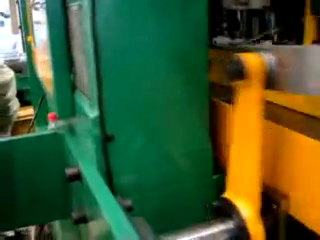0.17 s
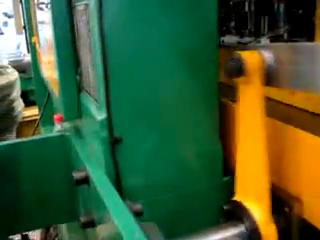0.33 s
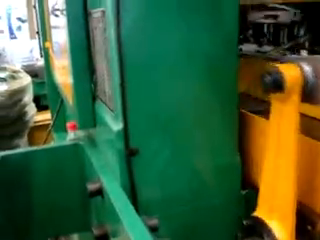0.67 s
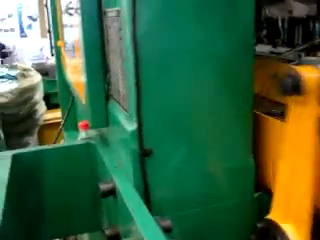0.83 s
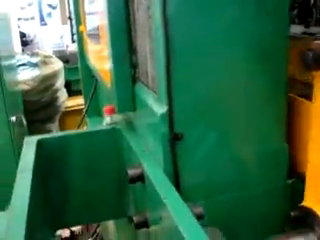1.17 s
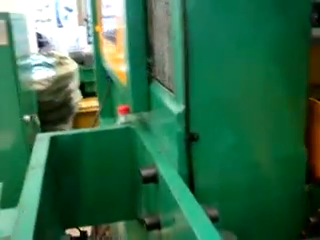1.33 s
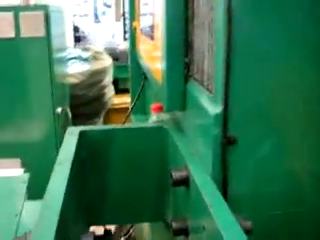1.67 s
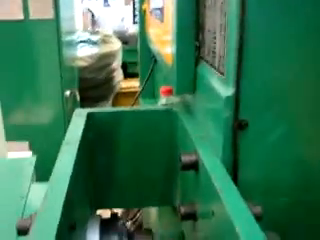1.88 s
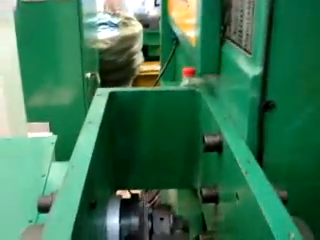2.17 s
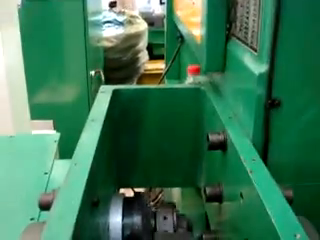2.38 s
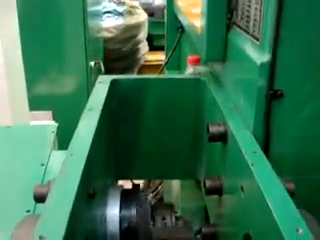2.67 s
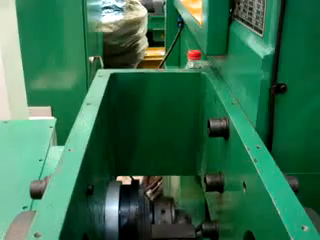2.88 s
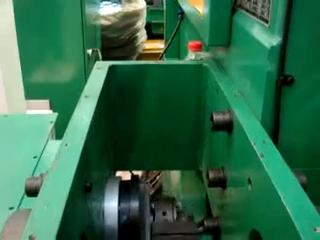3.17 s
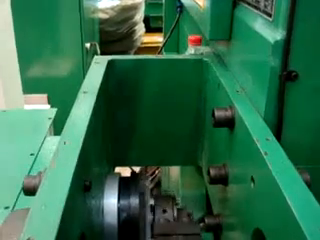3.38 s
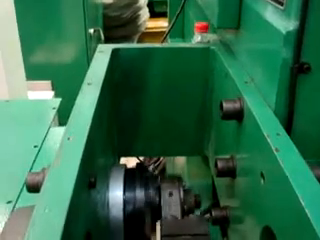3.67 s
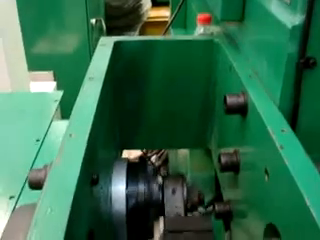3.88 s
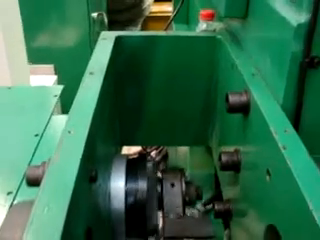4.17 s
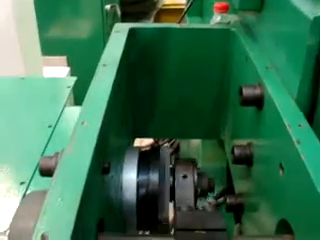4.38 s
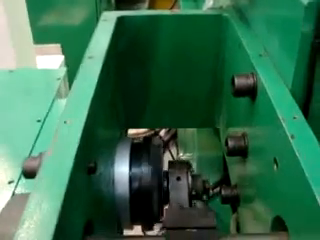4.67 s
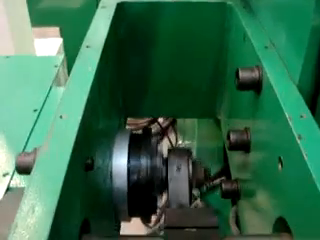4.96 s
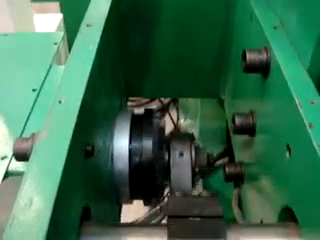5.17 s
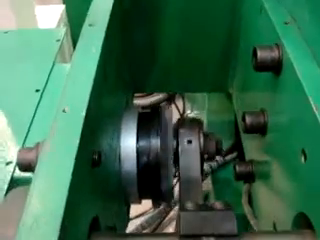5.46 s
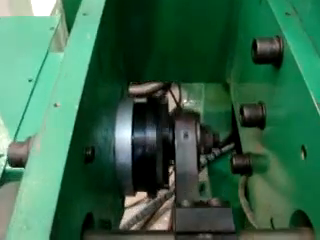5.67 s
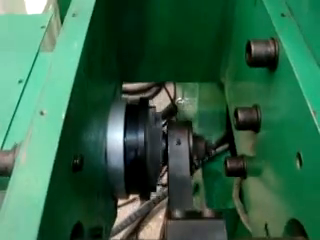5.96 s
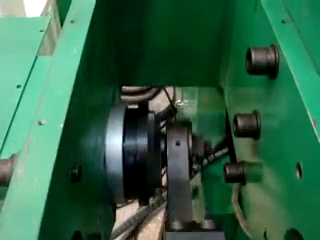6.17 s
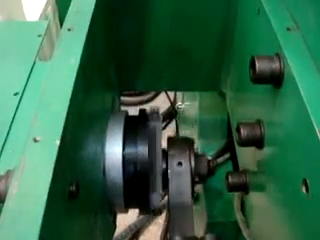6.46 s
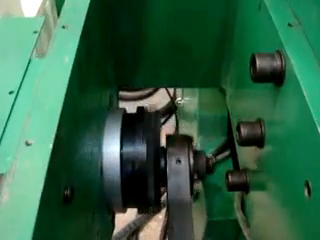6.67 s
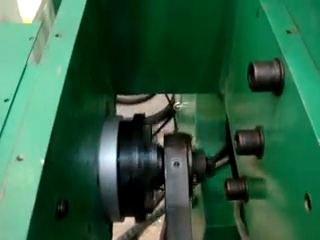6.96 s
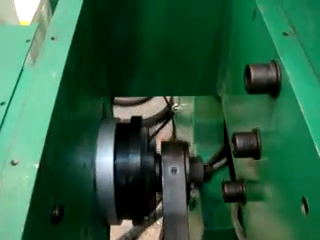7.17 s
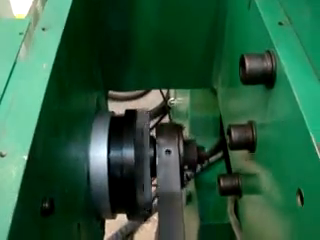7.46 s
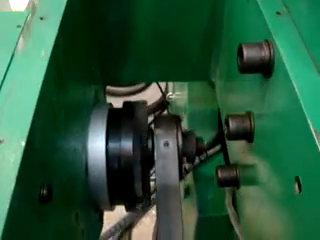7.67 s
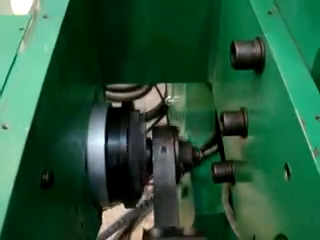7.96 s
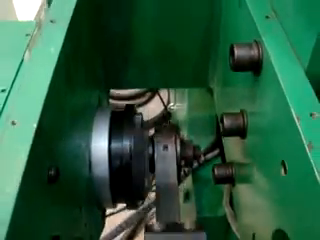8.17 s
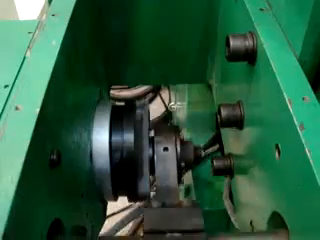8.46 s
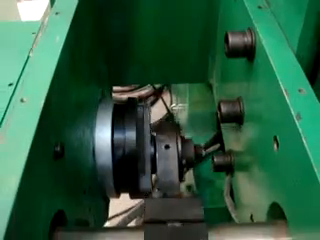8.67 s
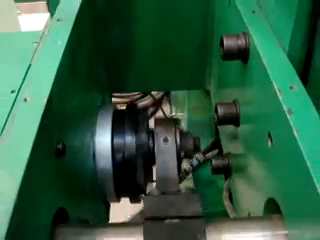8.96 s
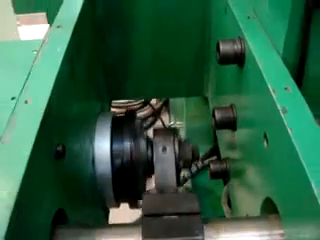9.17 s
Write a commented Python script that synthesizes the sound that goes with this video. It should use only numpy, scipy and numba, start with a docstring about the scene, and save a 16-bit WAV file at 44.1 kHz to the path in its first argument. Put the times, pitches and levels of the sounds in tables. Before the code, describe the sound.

From 0 to about 9.5 seconds a metal stamping press runs without pause, close to a phone microphone in a factory hall. Every 0.22 seconds the same cycle repeats: quick feed ticks and a short hiss of sliding strip, a heavy low clang as the punch lands, then about 0.04 seconds later a brighter, ringing snap and chatter as the tool lifts. Dull bearing knocks and a churning gear rumble fill the gaps. Tiny high squeaks occur until nearly 6 seconds, clearer near 1.3, 1.6, 2, 4.7 and 5.1. Extra slaps fall near 0.5, 0.7, 3.3, 4.5 and 9.3. Around 1 to 2 seconds a hollow resonance sinks in pitch; it fades after 4, while bright clatter softens from 3.3. Metallic ring colours drift slowly, peaks are slightly squashed, and a short diffuse echo surrounds the strokes.

```python
"""A stamping press at 272 strokes/min: each turn the strip feeds in, the punch clangs low, the tool lifts brightly.
Contacts set off dense decaying rings and strong modes; the lower part of each ring nearly repeats every turn.
Strip hiss, squeaks and slaps join in, with bearing knocks and a churning drive below.
A phone moves slowly along the frame: modes drift, a hollow note sinks and fades, bright clatter fades.
The strokes echo in a factory hall."""
import sys
import numpy as np
from scipy import signal
from scipy.fft import rfft, irfft, next_fast_len
from scipy.io import wavfile
from scipy.ndimage import uniform_filter1d
from numba import njit

SR = 44100
rng = np.random.default_rng(int(sys.argv[2]) if len(sys.argv) > 2 else 0)


def put_to_file(sound):
    """Save the sound as 16-bit audio at rate SR, in the file named by the first command-line argument."""
    columns = np.atleast_2d(sound).T  # one column per channel
    safe = np.clip(columns, -1, 1)
    whole_steps = np.round(safe * 32767)
    wavfile.write(sys.argv[1], SR, whole_steps.astype(np.int16))


N = 411453

# contacts within one turn [t/s after the punch lands, relative level/dB]
PUNCH_HITS = [(-.0005, -2), (.0048, 1.5), (.0135, -1), (.021, -14), (.029, -7)]
LIFT_HITS = [(.0385, -1.5), (.042, 1.5), (.0505, -4.5), (.0565, -11), (.066, -8), (.074, -17), (.098, -13)]
FEED_HITS = [(-.060, -20), (-.035, 4.5), (-.021, 0.5), (-.013, 5.5), (-.006, 5.5)]
# knocks of the crank bearings within one turn [t/s after the punch lands, relative level/dB]
THUD_HITS = [(.021, 2.5), (.029, 1.5), (.068, -5), (.107, -2), (.123, -6.5)]
# modes of the frame under the punch, and of the lifting tool [f/Hz, relative level/dB]
FRAME_MODES = [(345, -7), (425, -6), (474, -7), (517, -2), (640, -3), (668, 0), (762, -3), (805, -2),
               (867, -3), (980, -7), (1045, 0), (1090, -3), (1254, -2), (1402, -4), (1533, -3), (1634, -4)]
TOOL_MODES = [(276, -7), (334, -1), (401, -6), (530, -1), (563, -1), (600, -1), (711, -1), (936, 0),
              (990, -2), (1320, -3), (1367, 0), (1682, -4), (2210, -1), (2245, 1), (2417, -1), (2557, -3),
              (2592, 0), (2700, -2), (2815, -4), (3060, -5), (3577, -5)]
# spectra of the dense rings [f/Hz, relative level per Hz/dB]
PUNCH_COLOUR = [(50, -42.5), (120, -25), (230, -28), (400, -5.5), (700, 4), (1100, 1.5), (1700, 1.5),
                (2500, -3), (3500, -5), (4500, -7.5), (6000, -11), (8000, -22.5), (10000, -88)]
LIFT_COLOUR = [(50, -43), (120, -28), (230, -28), (400, -18), (700, -9.5), (1300, -4.5), (1750, -11),
               (2250, -6.5), (2700, -7), (3400, -12.5), (4400, -18), (6000, -16), (8000, -23), (10000, -35)]
FEED_COLOUR = [(100, -33), (350, -19), (800, -22), (1400, 12.5), (2500, 8), (4000, 7), (5700, 9),
               (8000, -6.5), (10000, -3)]
THUD_COLOUR = [(40, -43), (80, -21.5), (130, -12), (230, -4), (380, -2), (650, -2), (1000, -2),
               (1600, -14.5), (4000, -62)]
# spectra of the sliding strip and the drive [f/Hz, relative level per Hz/dB]
SLIDE_COLOUR = [(500, -52), (2000, -10), (4000, 0.5), (5700, 3.5), (7000, 6.5), (8500, 5.5), (10000, -18)]
DRIVE_COLOUR = [(25, -42), (50, -45.5), (80, -22.5), (120, -12.5), (210, 1), (370, 2.5), (700, 3),
                (1050, -0.5), (1700, -6.5), (2700, -18.5), (4000, -13), (6000, -25.5), (10000, -31.5)]
# loudest squeals of the strip in its guides [t/s, relative level/dB]
SQUEAKS = [(0.017, -29.4), (1.342, -30.5), (1.559, -31), (2.002, -29.4), (4.651, -31.5), (5.096, -31)]
# strip slapping the die just ahead of the punch [t/s, relative level/dB]
SLAPS = [(0.473, -17.5), (0.697, -16.5), (3.345, -20), (4.45, -19.5), (9.305, -20.5)]
# 60 dB decay times [dense body/s, dense treble/s, strong modes towards 0 Hz/s]
PUNCH_T60_S = (.095, .115, .22)
LIFT_T60_S = (.10, .135, .38)

FIRST_S, TURN_S = .0447, .220694
STARTS_S = FIRST_S + TURN_S * np.arange(-2, 43)
AGE_S = np.arange(20000) / SR
TIME_S = np.arange(N) / SR
TOP_HZ = 9900

# part levels
PUNCH_DB, LIFT_DB, FEED_DB = 0.59, -1.65, -2.5
DRIVE_DB, DRIVE_FADE_DB_PER_S = 1.6, .17
# faint squeaks, by chance, until the strip runs freely
SQUEAK_CHANCE, SQUEAK_DB, SQUEAK_LEAD_S, STICKS_UNTIL_S = .5, -34, .024, 5.7
# phone swings from the tool's open side to a pocket between the guards, then leans over its rim
SWING_S, SWING_TAKES_S = 1.44, 0.38
HOLLOW_START_HZ, HOLLOW_END_HZ, HOLLOW_WIDTH_HZ = 945, 690, 190.0
HOLLOW_DB, HOLLOW_LEFT_S, HOLLOW_FADE_DB_PER_S = -8.5, 4, 5.5
BRIGHT_HZ, BRIGHT_WIDTH_HZ = 3540.0, 770.0
BRIGHT_DB, BRIGHT_SHADED_S, BRIGHT_FADE_DB_PER_S = -7.5, 3.3, 7.5


def punch():
    """The punch lands and breaks through the strip; the frame clangs."""
    body_t60_s, treble_t60_s, mode_t60_s = PUNCH_T60_S
    crash = clatter(PUNCH_HITS, PUNCH_COLOUR, body_t60_s, treble_t60_s,
                    repeat_hz=1830, scatter_db=0.0, crack=0.62)
    frame = clang(FRAME_MODES, offset_s=-0.00049, t60_s=mode_t60_s, half_hz=1770,
                  wander_db=2.0, scatter_db=0.0)
    return undb(-17.5) * crash + undb(-21) * frame


def lift_off():
    """The stripper plate snaps back against its stops and chatters; the tool rings."""
    body_t60_s, treble_t60_s, mode_t60_s = LIFT_T60_S
    crash = clatter(LIFT_HITS, LIFT_COLOUR, body_t60_s, treble_t60_s,
                    repeat_hz=3300, scatter_db=1.5, crack=0.94)
    tool = clang(TOOL_MODES, offset_s=.041, t60_s=mode_t60_s, half_hz=1120,
                 wander_db=1.0, scatter_db=0.2)
    return undb(-15.5) * crash + undb(-22.5) * tool


def feed():
    """The feed linkage ticks; the strip hisses as it slides forward, and squeaks."""
    ticks = clatter(FEED_HITS, FEED_COLOUR, t60_s=0.1, treble_t60_s=0.12,
                    repeat_hz=2200, scatter_db=3.0, crack=0.25)
    speed = np.exp(-((AGE_S - TURN_S / 2) / 0.037) ** 2)
    grip = undb(1.5 * rng.standard_normal((len(STARTS_S), 1)))
    hiss = grip * speed * dense_ring(SLIDE_COLOUR, repeat_hz=3000)
    slide = each_turn(hiss, -.008 - TURN_S / 2)  # fastest 8 ms before the punch
    return undb(-30.5) * ticks + undb(-31.5) * slide + squeaks()


def squeaks(squeak_hz=5780, waver_rms_hz=70, length_s=0.0088):
    """Now and then the strip sticks and sings for an instant, on a wavering pitch."""
    sticks = (rng.random(len(STARTS_S)) < SQUEAK_CHANCE) & (STARTS_S < STICKS_UNTIL_S)
    faint = [(s - SQUEAK_LEAD_S, SQUEAK_DB) for s in STARTS_S[sticks]]
    swells = [undb(db) * np.exp(-((TIME_S - s) / length_s) ** 2) for s, db in SQUEAKS + faint]
    waver = unit(uniform_filter1d(rng.standard_normal(N), size=100))
    hz = squeak_hz + waver_rms_hz * waver
    tone = unit(np.sin(2 * np.pi * np.cumsum(hz) / SR))
    return np.max(swells, axis=0) * tone


def slaps(t60_s=0.13):
    """Now and then the strip bows and slaps down on the die: decaying noise bursts."""
    envelope = sum((TIME_S > s) * undb(db - 60 * np.abs(TIME_S - s) / t60_s) for s, db in SLAPS)
    return envelope * tint(rng.standard_normal(N), PUNCH_COLOUR)


def crank():
    """The bearings knock dully as the load on the ram reverses."""
    knocks = clatter(THUD_HITS, THUD_COLOUR, t60_s=0.16, treble_t60_s=0.092,
                     repeat_hz=1500, scatter_db=2.5, crack=0.16)
    return undb(-23.0) * knocks


def drive():
    """Gears and bearings churn, the low part nearly alike every turn, over a steady rumble."""
    window = np.sin(np.pi * np.minimum(AGE_S / (2 * TURN_S), 1))  # two turns long, so rows overlap
    churn = each_turn(window * dense_ring(DRIVE_COLOUR, repeat_hz=1210), 0)
    rumble = tint(rng.standard_normal(N), DRIVE_COLOUR)
    return undb(-29.0) * churn + undb(-31.5) * rumble


def hollow(press):
    """Air between the guards resonates; its note sinks as the phone swings, fades as it leans over."""
    swung = (1 + np.tanh((TIME_S - SWING_S) / SWING_TAKES_S)) / 2
    hz = HOLLOW_START_HZ + (HOLLOW_END_HZ - HOLLOW_START_HZ) * swung
    gain = fading(HOLLOW_DB, HOLLOW_LEFT_S, HOLLOW_FADE_DB_PER_S)
    return gain * resonance(press, hz, HOLLOW_WIDTH_HZ)


def open_side(press):
    """Bright clatter leaves the tool's open side, then fades as the upright shades it."""
    bright = resonance(press, np.full(N, BRIGHT_HZ), BRIGHT_WIDTH_HZ)
    return fading(BRIGHT_DB, BRIGHT_SHADED_S, BRIGHT_FADE_DB_PER_S) * bright


def hall(x, low_t60_s, high_t60_s, wet_db):
    """Diffuse echo of the factory hall, duller as it dies."""
    age_s = np.arange(SR) / SR
    low, high = split(rng.standard_normal(SR), 3800)
    tail = low * undb(-60 * age_s / low_t60_s) + 0.54 * high * undb(-60 * age_s / high_t60_s)
    tail *= 1 - np.exp(-age_s / 0.041)  # gradual build-up
    echo = signal.fftconvolve(x, tail / np.linalg.norm(tail))[:N]
    return x + undb(wet_db) * echo


def clatter(hits, colour, t60_s, treble_t60_s, repeat_hz, scatter_db, crack):
    """Steel meets steel: contacts set off a dense ring, with separate body and treble decays."""
    low, high = split(dense_ring(colour, repeat_hz), 1560)
    body = low * decay(hits, t60_s, scatter_db, crack)
    treble = high * decay(hits, treble_t60_s, scatter_db, crack)
    return each_turn(body + treble, hits[0][0])


def clang(modes, offset_s, t60_s, half_hz, wander_db, scatter_db, rise_s=0.0014):
    """Strong modes of a heavy part swell and fade as the phone crosses its standing waves."""
    hz, db = np.transpose(modes)
    damping = np.log(1000) / t60_s * (1 + hz / half_hz)  # decay time halves at half_hz
    chance = rng.standard_normal((2, len(STARTS_S), len(hz)))
    # play in the parts shifts the phase of the high modes most
    play = chance[0] * hz / 4500
    phase = rng.uniform(0, 2 * np.pi, len(hz)) + 0.38 * drifting(len(hz), count=4) + play
    size = undb(db + wander_db * drifting(len(hz), count=6) + scatter_db * chance[1])
    oscillations = np.exp((2j * np.pi * hz - damping)[:, None] * AGE_S)
    rings = (size * np.exp(1j * phase)) @ oscillations
    return each_turn(rings.imag * (1 - np.exp(-AGE_S / rise_s)), offset_s)


def dense_ring(colour, repeat_hz):
    """Countless overlapping modes: mostly alike per stroke below repeat_hz, increasingly random above."""
    f = np.fft.rfftfreq(len(AGE_S), 1 / SR)
    f = f[f < TOP_HZ]
    alike = .92 * low_share(len(AGE_S), repeat_hz)[:len(f)]  # power share
    pattern = drifting(2 * len(f), count=5).view(complex)
    fresh = rng.standard_normal((len(STARTS_S), 2 * len(f))).view(complex)
    hz, db = np.transpose(colour)
    gain = undb(np.interp(np.log(np.maximum(f, 1)), np.log(hz), db))
    spectrum = gain * (np.sqrt(alike) * pattern + np.sqrt(1 - alike) * fresh)
    return unit(irfft(spectrum, len(AGE_S)))


def decay(hits, t60_s, scatter_db, crack, crack_s=0.0015, rise_s=0.00089):
    """Envelope per stroke: each contact is a short crack and a longer ring; contacts add in power."""
    s, db = np.transpose(hits)
    age_s = np.maximum(AGE_S - (s - s[0])[:, None], 0)
    fall = np.exp(-np.log(1000) * age_s / t60_s) + crack * np.exp(-age_s / crack_s)
    shape = (1 - np.exp(-age_s / rise_s)) * fall
    force = undb(db + scatter_db * rng.standard_normal((len(STARTS_S), len(s))))
    return np.sqrt(force ** 2 @ shape ** 2)


def drifting(size, count):
    """One random row per stroke, fading through `count` patterns as the phone crosses the sound field."""
    place = np.linspace(0, count - 1, len(STARTS_S))[:, None] - np.arange(count)
    return np.cos(np.pi / 2 * np.clip(place, -1, 1)) @ rng.standard_normal((count, size))


def each_turn(rows, offset_s):
    """Lay one row of sound into every turn of the crank."""
    out = np.zeros(N + 2 * SR)  # 1 s margin at each end
    for s, row in zip(STARTS_S, rows):
        i = int((s + offset_s + 1) * SR)
        out[i:i + len(row)] += row
    return out[SR:SR + N]


@njit
def resonance(x, hz, width_hz):
    """State-variable band-pass with a moving centre, gain 1 there."""
    y, band, low = np.empty(len(x)), 0., 0.
    for i in range(len(x)):
        g, k = np.tan(np.pi * hz[i] / SR), width_hz / hz[i]
        v = (band + g * (x[i] - low)) / (1 + g * (g + k))
        band, low, y[i] = 2 * v - band, low + 2 * g * v, k * v
    return y


def tint(x, colour):
    """Filter the last axis by a (f/Hz, level/dB) spectrum; rms 1."""
    hz, db = np.transpose(colour)
    size = next_fast_len(x.shape[-1])
    f = np.maximum(np.fft.rfftfreq(size, 1 / SR), 1)
    gain = undb(np.interp(np.log(f), np.log(hz), db))
    return unit(irfft(rfft(x, size) * gain, size)[..., :x.shape[-1]])


def split(x, hz):
    """Low and high parts whose powers add up to the whole."""
    spectrum, low = rfft(x), low_share(x.shape[-1], hz)
    return irfft(spectrum * np.sqrt(low)), irfft(spectrum * np.sqrt(1 - low))


def low_share(size, hz):
    """Share of the power in each frequency bin on the low side of a crossover."""
    return 1 / (1 + (np.fft.rfftfreq(size, 1 / SR) / hz) ** 4)


def fading(db, from_s, db_per_s):
    """Gain that holds its level, then falls steadily in dB."""
    return undb(db - db_per_s * np.maximum(TIME_S - from_s, 0))


def undb(db):
    """Decibels to gain."""
    return 10 ** (np.asarray(db) / 20)


def unit(x):
    """Scale to rms 1."""
    return x / np.sqrt(np.mean(x ** 2))


def scene():
    """Strokes echo in the hall; the drive joins dry; both pass the two resonances."""
    blows = undb(PUNCH_DB) * (punch() + crank()) + undb(LIFT_DB) * lift_off()
    strokes = blows + undb(FEED_DB) * feed() + slaps()
    echoed = hall(strokes, low_t60_s=0.45, high_t60_s=0.41, wet_db=-14.5)
    press = echoed + fading(DRIVE_DB, 0, DRIVE_FADE_DB_PER_S) * drive()
    return (press + hollow(press) + open_side(press))[None]


def record(dry):
    """The phone rounds the loudest peaks, thins the bass and cuts the top."""
    ceiling, bass_hz = 1.1, 65
    rounded = ceiling * np.tanh(dry / ceiling)
    thinned = signal.sosfilt(signal.butter(2, bass_hz, "high", fs=SR, output="sos"), rounded)
    return signal.sosfilt(signal.ellip(12, .2, 80, TOP_HZ, fs=SR, output="sos"), thinned)


dry = scene()
out = record(dry)
put_to_file(out)
```